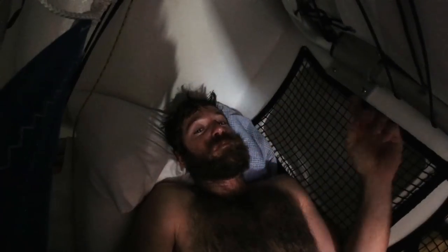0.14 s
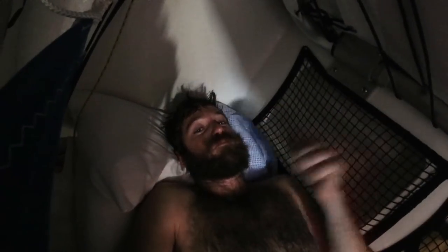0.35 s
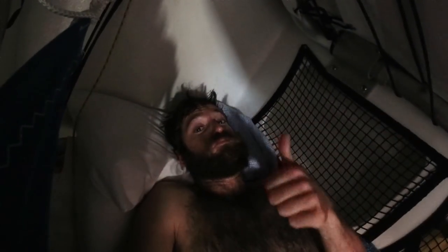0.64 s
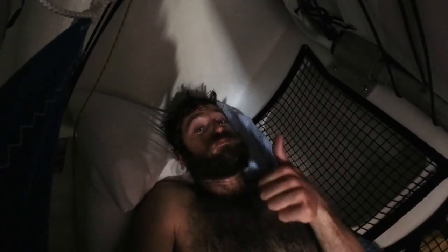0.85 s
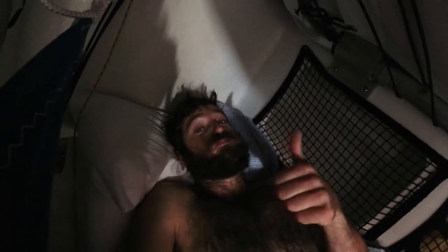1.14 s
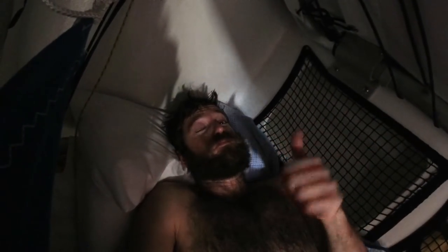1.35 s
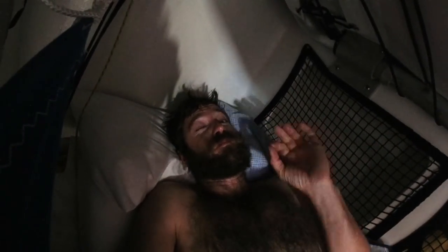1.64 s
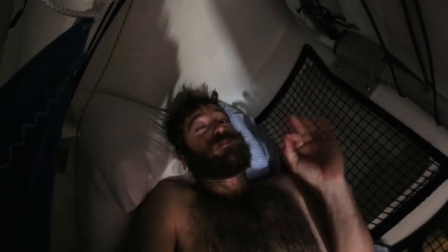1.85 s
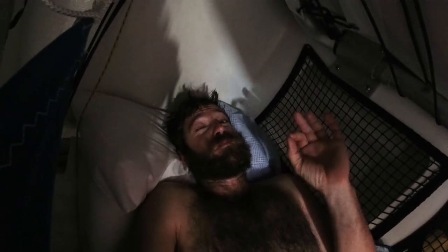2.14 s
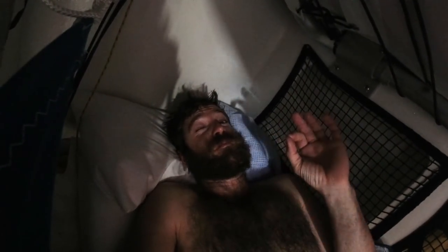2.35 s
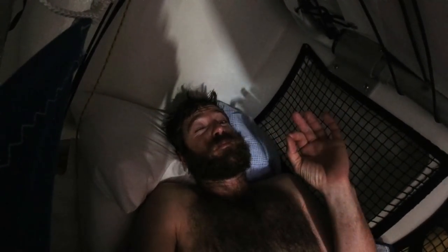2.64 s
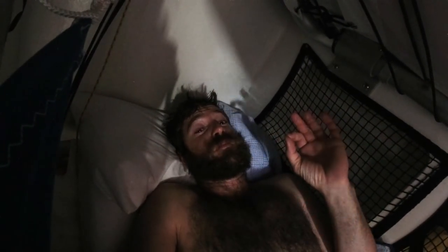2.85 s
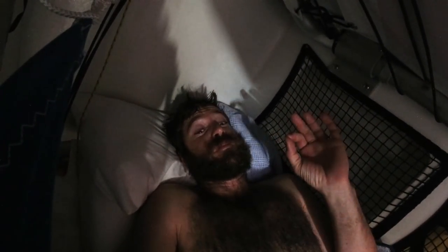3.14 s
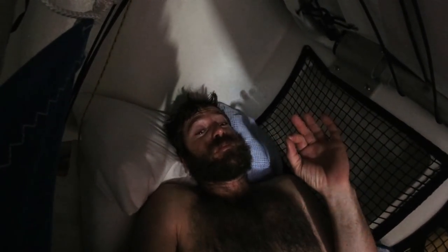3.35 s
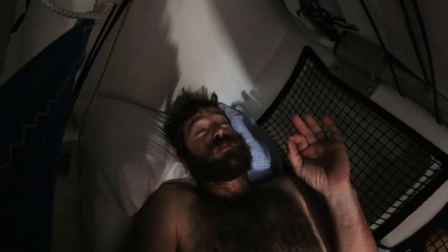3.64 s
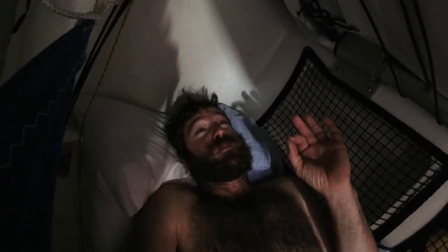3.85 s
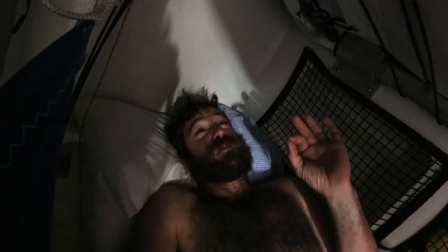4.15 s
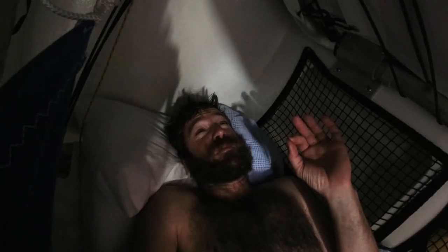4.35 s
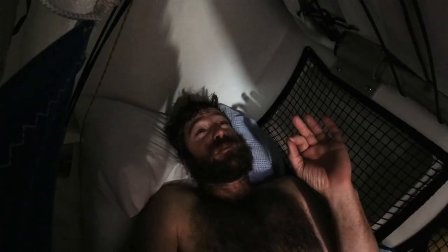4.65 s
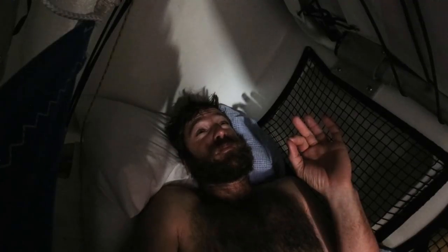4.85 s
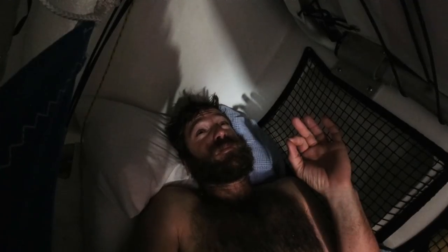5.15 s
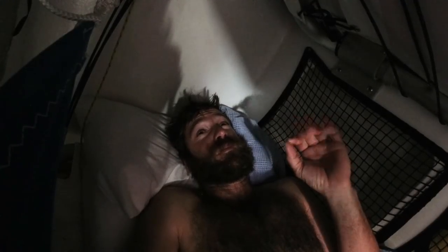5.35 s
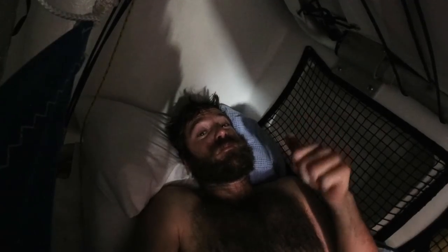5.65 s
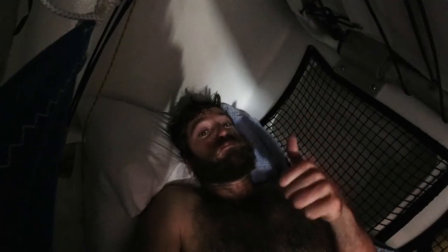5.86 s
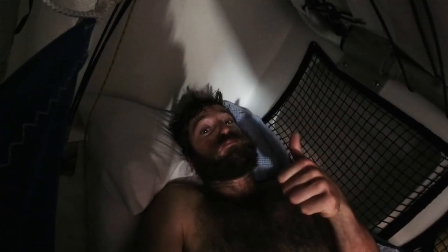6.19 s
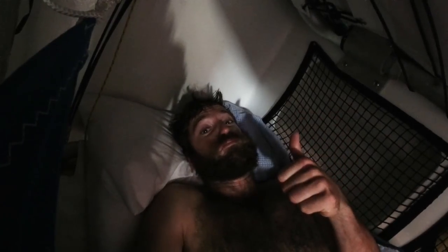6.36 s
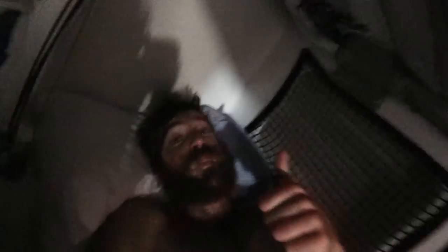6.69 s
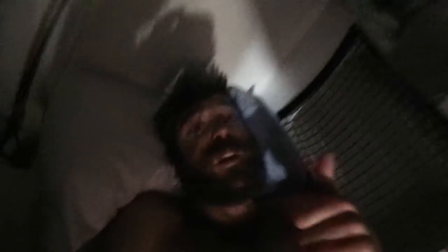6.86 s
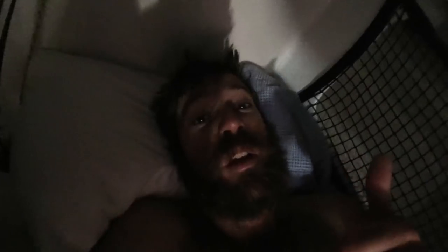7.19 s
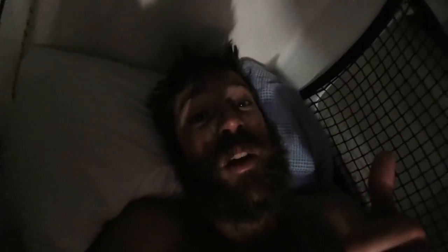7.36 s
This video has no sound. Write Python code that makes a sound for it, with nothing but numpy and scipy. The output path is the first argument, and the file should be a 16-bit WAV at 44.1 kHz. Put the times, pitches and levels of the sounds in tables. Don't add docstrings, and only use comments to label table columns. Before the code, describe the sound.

Hard, boxy hull blows repeat steadily, speed into a rapid clatter, thin out and stop, leaving murmuring water and a few separate deck knocks.

```python
import sys
import numpy as np
from scipy import signal
from scipy.fft import rfft, irfft
from scipy.io import wavfile
from scipy.ndimage import uniform_filter1d, map_coordinates

SR = 44100
rng = np.random.default_rng(int(sys.argv[2]) if len(sys.argv) > 2 else 0)


def master_out(mix):
    frames = np.transpose(np.atleast_2d(mix))
    ceiling = np.clip(frames, -1, 1)
    pcm = np.round(ceiling * 32767).astype(np.int16)
    wavfile.write(sys.argv[1], SR, pcm)


def volts_from_decibels(level):
    exponent = np.asarray(level, float) / 20
    return 10 ** exponent


N = 331747
BLOW_T = np.arange(9216) / SR

# (time [s], level [dB])
FLOW = [(5.3, 1), (5.6, 1.4), (6.1, 2.1), (6.5, 5), (6.8, 4), (7.05, 5), (7.25, 5), (7.52, 4)]
# (time [s], level [dB])
LURCHES = [
    (5.05, -39.5),
    (6.5, -41.5),
    (6.72, -65),
    (6.96, -48.5),
    (7.18, -32),
    (7.42, -59),
]
# (frequency [Hz], density [dB per Hz])
WASH_SPECTRUM = [(60, -38), (100, -19), (180, -10), (350, -14.5), (490, -14.5), (1270, -21.5), (3000, -29),
                 (4500, -34.5), (8000, -58)]
LURCH_SPECTRUM = [(12, -34), (20, -1), (38, -1.5), (113, -14.5), (160, -19), (210, -53.5), (350, -120)]
SPRAY_SPECTRUM = [(2500, -33), (4500, -3.5), (6500, -8.5), (9000, 1), (11500, -2.5), (13500, -6),
                  (16000, -26.5)]
# (frequency [Hz], likeness [-1 to 1])
WASH_ALIKE = [(60, 0.97), (160, 0.94), (430, 0.94), (1160, 1), (3110, 0.11)]
# (frequency [Hz], width [Hz], level [dB])
DRONE_PANELS = [(353, 120, 0)]

HAUL_SLIPS = [0.0102, 0.0853, 0.1734, 0.2632, 0.5054, 0.581, 0.6576, 0.7343, 0.8088, 0.8797, 0.9526, 1.02,
              1.0995, 1.1979, 1.3198, 1.44, 1.5429, 1.6439, 1.7312, 1.804, 1.877, 1.9549, 2.0204, 2.0889,
              2.1545, 2.2228, 2.2892, 2.3579]
RUN_SLIPS = [2.4382, 2.515, 2.5951, 2.6786, 2.756, 2.8305, 2.9028, 2.9618, 3.0047, 3.058, 3.1136, 3.164,
             3.2088, 3.251, 3.3009, 3.349, 3.3951, 3.436, 3.4799, 3.5146, 3.5565, 3.5979, 3.6427, 3.682,
             3.7174, 3.7521]
RATTLE_SLIPS = [3.7889, 3.8246, 3.8573, 3.8964, 3.926, 3.9573, 3.987, 4.0202, 4.0566, 4.0938, 4.137, 4.1755,
                4.2124, 4.2563, 4.3101, 4.372, 4.435, 4.4835, 4.5445, 4.6353, 4.749, 4.8376, 4.9499]
# (time [s], level [dB])
LOAD = [(0, 5.5), (1.1, 5.5), (1.5, 6), (2.9, 5.5), (3.3, 4), (3.6, 2), (4, 1), (4.3, 0.87), (4.95, 0.75)]
# (frequency [Hz], density [dB per Hz])
FIBRE_SPECTRUM = [(2000, -89), (4000, -28), (7300, -10.5), (9300, -7), (11000, -1), (12300, -5.5),
                  (13500, -7.5), (15500, -15.5), (16000, -90)]
# (frequency [Hz], density [dB per Hz])
GROAN_SPECTRUM = [(15, -20), (30, 1.5), (55, 1), (85, 3), (110, -10), (160, -4), (230, 0.5), (400, -53),
                  (900, -120)]
CREEP_SPECTRUM = [(300, -36), (700, 1.5), (1500, 2.5), (3000, -4), (4500, -16), (6000, -31.5),
                  (9000, -43.5), (12000, -68)]
# (middle [s], half length [s], level [dB])
SWISH = (1.13, 0.1, -61)

# (frequency [Hz], level [dB], t60 [s])
HULL_MODES = [(47.5, -20.5, 0.16), (81, -17.5, 0.04), (132, -25, 0.015), (169.6, -25, 0.21),
              (222, -19, 0.17), (297.8, -12, 0.13), (337.8, -7, 0.098), (382, -16, 0.16), (402.8, -21, 0.1),
              (422.85, -10, 0.18), (440, -10, 0.081), (474.6, -22, 0.18), (508, -15.5, 0.12),
              (525.8, -14, 0.094), (575.8, -8, 0.057), (594.4, -16.5, 0.066), (681.3, -10.5, 0.047),
              (700, -10, 0.067), (742, -20, 0.045), (767, -12.5, 0.06), (815.4, -19, 0.061),
              (950.3, -20.5, 0.13), (1067, -25.5, .06), (1267, -10.5, 0.026), (1332.5, -15, 0.036),
              (2077, -33.5, 0.097), (2377, -24, 0.052)]
# (frequency [Hz], level [dB], t60 [s])
THUD_MODES = [(610, -5.5, 0.007)]
# (frequency [Hz],
# density [dB per Hz])
SKIN_SPECTRUM = [(60, -48.5), (135, -31.5), (210, -24), (340, -15.5), (630, -22), (890, -23.5),
                 (1290, -23.5), (1700, -25.5), (2400, -27.5), (3300, -37), (5500, -60.5), (7400, -78),
                 (9200, -65), (11000, -77.5), (16000, -100)]
# (frequency [Hz], t60 [s])
SKIN_T60 = [(100, 0.32), (400, 0.19), (1000, 0.14), (2500, 0.081), (6000, 0.13), (9200, 0.16),
            (12000, 0.085)]
# (frequency [Hz], likeness [-1 to 1])
SKIN_ALIKE = [(200, 1), (600, 0.84), (1500, 0.76), (3000, 0.005), (6000, -0.19)]

# (time [s], peak [dB], brightness [dB], contact [s])
KNOCKS = [
    (0.343, 7.5, 2.5, 0.0022),
    (6.453, 1, 0.5, 0.0043),
    (7.155, 2.5, 2.5, 0.0075),
    (7.502, -12, 1.5, 0.0019),
]
# (frequency [Hz], level [dB], t60 [s])
KNOCK_PANELS = [
    [(61.4, -21.5, 0.09), (158, -17, 0.16), (276, -21.5, 0.52), (311.6, 4.5, 0.06), (429, -14.5, 0.19),
     (1000, -11.5, 0.041), (1760, -22.5, 0.053), (111, -21, .2)],
    [(60, -25.5, .2), (281.4, -15, 0.22), (338, 0, 0.076), (422, -5, 0.12), (514, -13.5, 0.15),
     (645, -14.5, 0.086), (866, -15, 0.087)],
    [(59, -22.5, 0.26), (270, -23, 0.12), (362, -14, 0.09), (433, -3.5, 0.056), (512, -15, 0.075),
     (690, -7, 0.074), (1396, -36.5, 0.22)],
    [(60, -9.5, 0.66), (290, -2, 0.088), (448, -13.5, 0.16), (760, -11, 0.08), (1000, -13, .08),
     (1430, -27.5, 0.11)],
]
# (time [s], peak [dB], ring [Hz])
TICKS = [
    (6.5224, -48.5, 3880),
    (6.8954, -53.5, 3570),
    (6.951, -43.5, 3530),
]
# (start [s], hold [s], level [dB])
HUMS = [
    (6.507, 0.073, -27.5),
    (6.71, 0.045, -45.5),
]


def unit(x):
    return x / np.sqrt(np.mean(x ** 2) + 1e-20)


def along(points, hz):
    f, v = np.transpose(points)
    return np.interp(np.log(hz + 1), np.log(f + 1), v)


def clock():
    return np.arange(N) / SR


def curve(points):
    return np.interp(clock(), *np.transpose(points))


def wobble(rate):
    knots = rng.standard_normal(int(N * rate / SR) + 4)
    return map_coordinates(knots, [np.arange(N) * rate / SR])


def noise(size, gain, alike):
    hz = np.fft.rfftfreq(size, 1 / SR)
    turn = np.arccos(np.clip(along(alike, hz), -1, 1)) / 2
    spectra = rfft(rng.standard_normal((2, size))) * gain(hz)
    mid, side = irfft(spectra * [np.cos(turn), np.sin(turn)], size)
    return unit(np.array([mid + side, mid - side]))


def steady_noise(spectrum, alike):
    return noise(N, lambda f: volts_from_decibels(along(spectrum, f)), alike)


def add(track, s, sound):
    track[:, round(s * SR):][:, :sound.shape[1]] += sound


def heave():
    t, rise_s, t60_s = clock(), 0.053, 0.48
    return sum(volts_from_decibels(db - 60 * np.maximum(t - s, 0) / t60_s) * np.clip(1 + (t - s) / rise_s, 0, 1)
               for s, db in LURCHES)


def wash(flow_db, heaving):
    level = volts_from_decibels(-58.5 + flow_db) + volts_from_decibels(-21) * heaving
    return level * volts_from_decibels(0.87 * wobble(19)) * steady_noise(WASH_SPECTRUM, WASH_ALIKE)


def panel_drone():
    def resonance(f):
        return sum(volts_from_decibels(db) * f * w / np.hypot(c * c - f * f, f * w) for c, w, db in DRONE_PANELS) ** 2

    ends_s, fade_s, drop_db = 5.67, 0.99, -13
    level_db = -54 + drop_db * np.clip((clock() - ends_s) / fade_s, 0, 1) ** 2
    return volts_from_decibels(level_db + 2.5 * wobble(10)) * noise(N, resonance, [(300, 0.99)])


def lurch(heaving):
    level = (volts_from_decibels(-56) + heaving) * volts_from_decibels(2.1 * wobble(45))
    return level * steady_noise(LURCH_SPECTRUM, [(60, 1.0)])


def spray(flow_db):
    level_db = -86 + 3.5 * flow_db + 0.6 * wobble(10)
    return volts_from_decibels(level_db) * steady_noise(SPRAY_SPECTRUM, [(5000, 0.1)])


def sea():
    flow_db, heaving = curve(FLOW), heave()
    return wash(flow_db, heaving) + panel_drone() + lurch(heaving) + spray(flow_db)


def slips():
    usual_s, longest_s = 0.089, 0.1
    s = np.array(HAUL_SLIPS + RUN_SLIPS + RATTLE_SLIPS)
    hold_s = np.minimum(np.diff(s, prepend=s[0] - usual_s), longest_s)
    return s, np.log2(hold_s / usual_s), np.interp(s, *np.transpose(LOAD))


def fibre_hiss(load_db, speed):
    t, times = clock(), slips()[0]
    since = t - times[np.maximum(np.searchsorted(times, t) - 1, 0)]
    rasp = volts_from_decibels(-15) + volts_from_decibels(-60 * np.abs(since) / 0.12)
    middle, half, swish_db = SWISH
    swish = volts_from_decibels(swish_db) * np.exp(-((t - middle) / half) ** 2)
    drag = rasp * volts_from_decibels(11.5 - 86.5 + 3.4 * load_db - 5 * speed) + swish
    return drag * volts_from_decibels(3 * wobble(25)) * steady_noise(FIBRE_SPECTRUM, [(5000, 0.05)])


def hull_groan(load_db, speed):
    level_db = -35.5 + 1.61 * load_db + 0.7 * speed
    return volts_from_decibels(level_db + 1.5 * wobble(9)) * steady_noise(GROAN_SPECTRUM, [(60, 1.0)])


def scrape(load_db, speed):
    level_db = -52.5 + 1.1 * load_db + 4 * speed
    return volts_from_decibels(level_db + 2.5 * wobble(60)) * steady_noise(CREEP_SPECTRUM, SKIN_ALIKE)


def chafe():
    t, (times, held, _), load_db = clock(), slips(), curve(LOAD)
    speed = uniform_filter1d(np.interp(t, times, -held), size=SR // 5)
    rest_s, settle_s = 4.97, 0.099
    moving = np.clip(1 - (t - rest_s) / settle_s, 0, 1) ** 2
    return moving * (fibre_hiss(load_db, speed) + hull_groan(load_db, speed) + scrape(load_db, speed))


def onset(rise):
    fade = np.cos(np.pi / 2 * (BLOW_T / BLOW_T[-1]) ** 4)
    return (1 - np.exp(-(BLOW_T / rise) ** 2)) * fade


def scatter(tilt_db, rise, linger=0.92):
    def lean(f):
        return volts_from_decibels(along(SKIN_SPECTRUM, f) + tilt_db * np.log2(1 + f / 500))

    hz, t, z = signal.stft(noise(len(BLOW_T), lean, SKIN_ALIKE), SR, nperseg=256)
    decay = volts_from_decibels(-60 * t / linger / along(SKIN_T60, hz)[:, None])
    tail = signal.istft(z * decay, SR, nperseg=256)[1]
    return tail[:, :len(BLOW_T)] * onset(rise)


def ring(modes, rise, side_db):
    hz, db, t60 = np.transpose(modes)[:, :, None]
    sign = (-1) ** np.arange(len(modes))[:, None]
    level = sign * volts_from_decibels(db - 60 * BLOW_T / t60) * onset(rise)
    phase = 2 * np.pi * hz * BLOW_T
    mid = level * np.sin(phase)
    side = volts_from_decibels(side_db) * level * (hz / 500) ** 0.54 * np.cos(phase)
    return np.array([mid + side, mid - side])


def creep(pull):
    return volts_from_decibels(-30.5) * pull[:, 800:N + 800] * steady_noise(CREEP_SPECTRUM, SKIN_ALIKE)


def rope():
    track, pull = np.zeros((2, N + SR)), np.zeros((1, N + SR))
    skin = scatter(tilt_db=2.0, rise=0.0015)
    edge = scatter(tilt_db=-0.5, rise=0.0045, linger=0.83)
    cabin = scatter(tilt_db=6.0, rise=0.047, linger=2.2)
    before = BLOW_T[800::-1]
    lead = np.exp(-before / 0.0058)[None] * np.minimum(before / 0.001, 1)
    modes = ring(HULL_MODES, rise=0.001, side_db=-16.5)
    thud = -ring(THUD_MODES, rise=0.00047, side_db=-18.5)[:, 0]
    deck_pair = np.array([400 < hz < 470 for hz, _, _ in HULL_MODES])
    times, held, load_db = slips()
    jerk_db = load_db + 0.5 * held
    tone_db = 1.5 - 0.5 * load_db + 2 * rng.standard_normal(len(times))
    judder_s, judder_db = 0.016, -2
    for s, db, bright_db in zip(times, jerk_db, tone_db):
        body = volts_from_decibels(0.4 * db * deck_pair + 0.92 * rng.standard_normal(len(HULL_MODES))) @ modes
        fresh = volts_from_decibels(-21 + bright_db) * scatter(tilt_db=0.4, rise=0.0038, linger=0.84)
        dense = volts_from_decibels(-16.5) * skin + volts_from_decibels(-14 + bright_db) * edge + volts_from_decibels(-35.5) * cabin
        add(track, s, volts_from_decibels(db) * (body + dense + fresh))
        for late, size in rng.random(size=(3, 2)):
            catch = (2 * size - 1) * volts_from_decibels(db - 19.5 + bright_db + judder_db) * edge
            add(track, s + judder_s * (0.16 + late), catch)
        add(track, s - 0.0004, volts_from_decibels(db) * thud)
        add(pull, s, volts_from_decibels(db + bright_db) * lead)
    return track[:, :N] + creep(pull)


def panel_knocks(track):
    for (s, db, bright_db, rise), panel in zip(KNOCKS, KNOCK_PANELS):
        body = ring(panel, rise, side_db=-13.5).sum(axis=1)
        skin = volts_from_decibels(-16.5 + bright_db) * scatter(tilt_db=-3.0, rise=0.003)
        add(track, s, volts_from_decibels(db + 1.5) * (body + skin))


def metal_ticks(track):
    for s, db, hz in TICKS:
        ping = 0.72 * np.sin(2 * np.pi * hz * BLOW_T) * volts_from_decibels(-60 * BLOW_T / 0.047)
        snap = noise(len(BLOW_T), lambda f: f / hz / (1 + (f / hz) ** 10), [(3000, 0.58)])
        add(track, s, volts_from_decibels(db - 1.0) * (ping + 0.77 * volts_from_decibels(-60 * BLOW_T / 0.035) * snap))


def line_hum():
    t, rise_db_per_s, fall_db_per_s = clock(), 902, 450
    swell = 0
    for s, hold, db in HUMS:
        rise_db = rise_db_per_s * np.maximum(s - t, 0)
        fall_db = fall_db_per_s * np.maximum(t - s - hold, 0)
        swell = swell + volts_from_decibels(db - rise_db - fall_db)
    return swell * np.sin(2 * np.pi * 180 * t)


def knocks():
    track = np.zeros((2, N + SR))
    panel_knocks(track)
    metal_ticks(track)
    return track[:, :N] + line_hum()


def scene():
    return sea() + chafe() + rope() + knocks()


def top_cut(x):
    return signal.sosfilt(signal.butter(12, 15800, fs=SR, output="sos"), x)


def record(dry):
    clipped = dry / (1 + np.abs(dry) ** 30) ** (1 / 30)
    return top_cut(clipped)


dry = scene()
out = record(dry)
master_out(out)
```